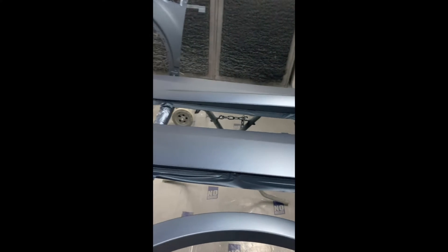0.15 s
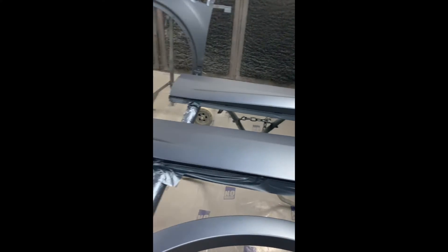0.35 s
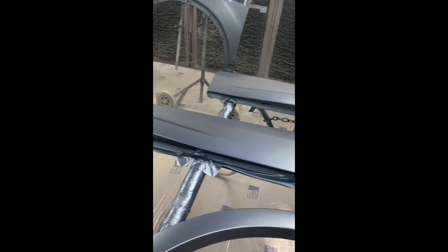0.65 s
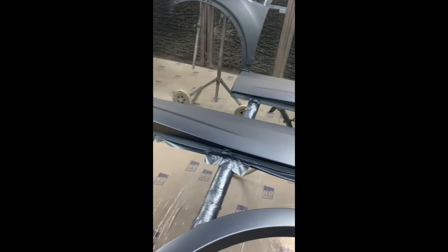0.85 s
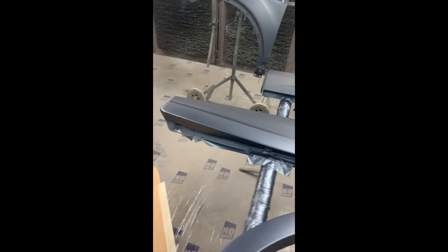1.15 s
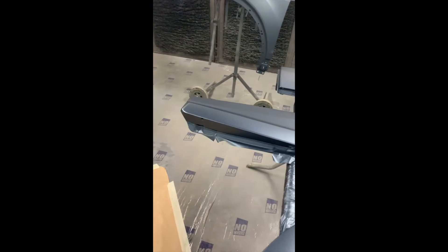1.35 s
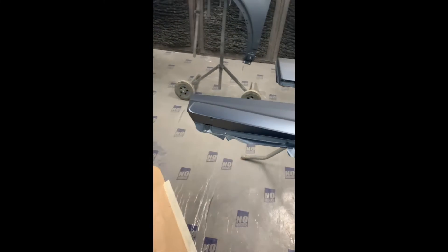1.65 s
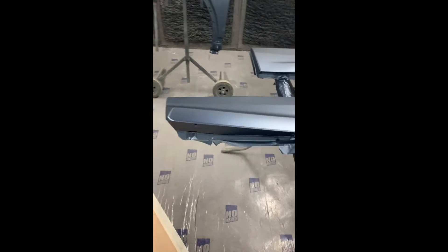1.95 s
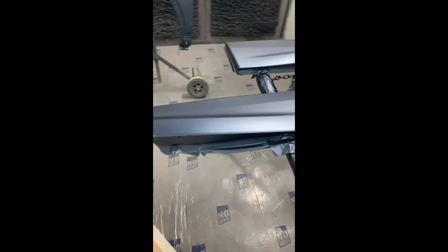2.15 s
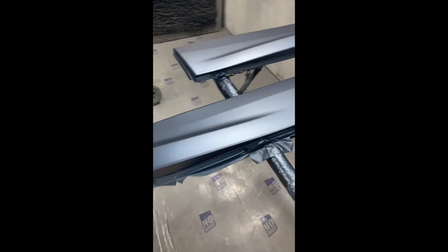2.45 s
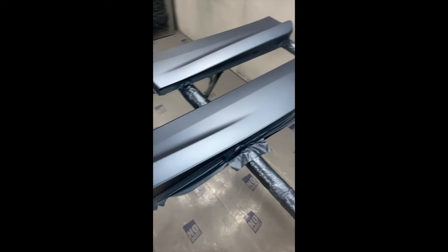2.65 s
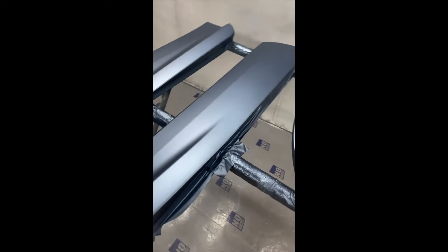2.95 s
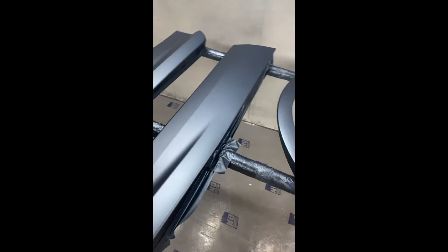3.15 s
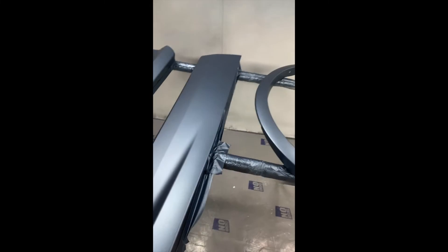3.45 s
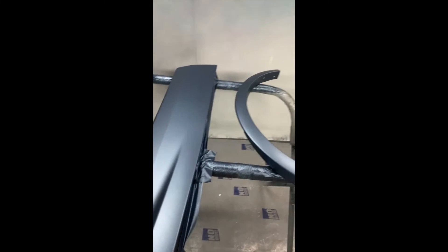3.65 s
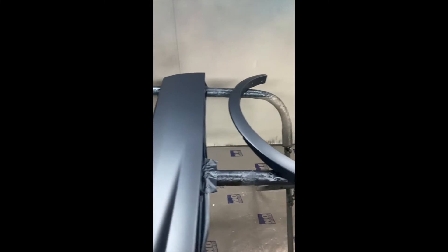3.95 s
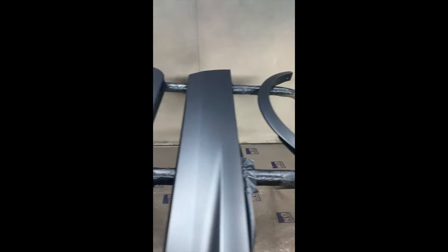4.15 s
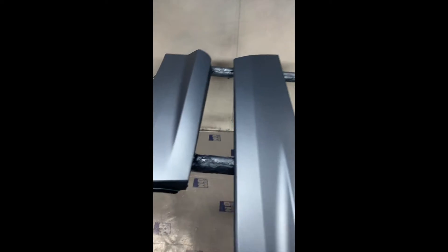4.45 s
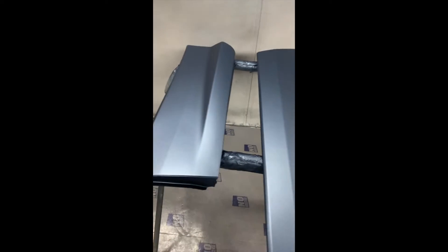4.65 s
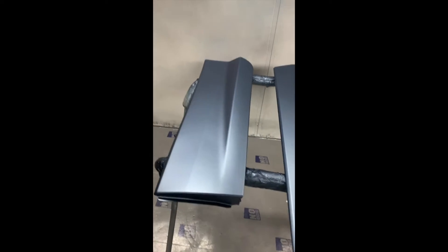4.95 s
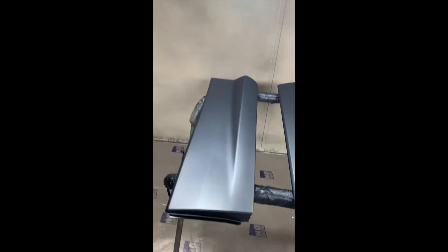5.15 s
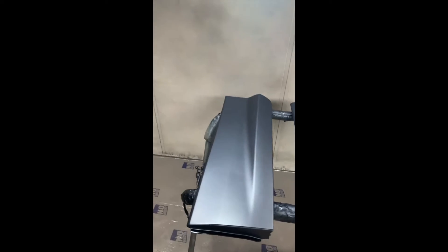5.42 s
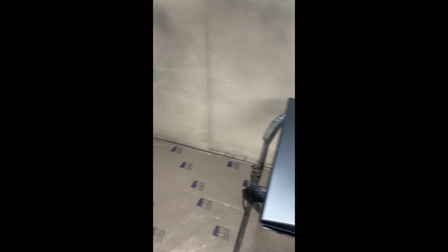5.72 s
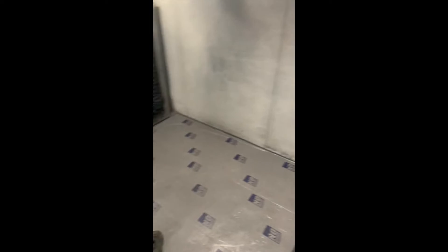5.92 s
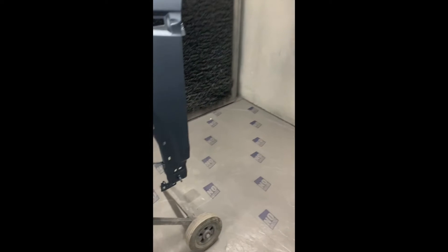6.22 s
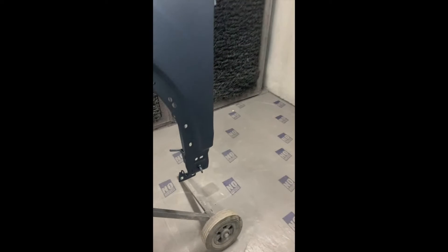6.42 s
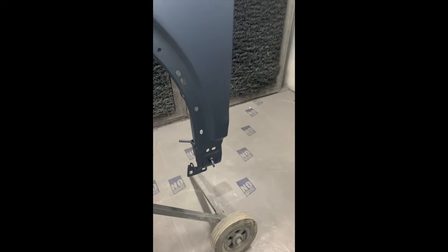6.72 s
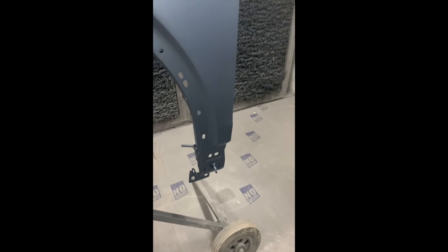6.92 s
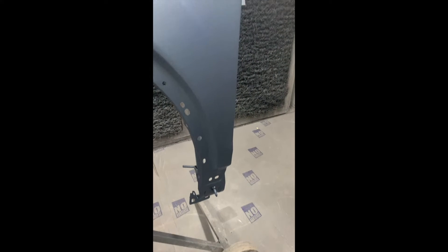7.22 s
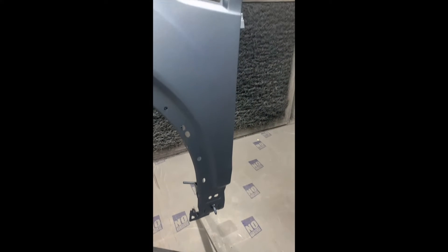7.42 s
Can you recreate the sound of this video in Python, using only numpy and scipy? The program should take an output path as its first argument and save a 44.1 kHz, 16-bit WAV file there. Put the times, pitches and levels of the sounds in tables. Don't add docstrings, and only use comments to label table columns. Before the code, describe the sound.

Inside a hard-walled spray booth, extraction fans roar and hum steadily with soft airy hiss, while shoes lightly scuff paper on the floor.

```python
import sys
import numpy as np
from scipy import signal
from scipy.fft import rfft, irfft, next_fast_len
from scipy.io import wavfile
from scipy.ndimage import uniform_filter1d

SR = 44100
rng = np.random.default_rng(int(sys.argv[2]) if len(sys.argv) > 2 else 0)


def transcribe(u):
    v = np.clip(np.atleast_2d(u).T, -1, 1)
    q = np.round(v * 32767).astype(np.int16)
    wavfile.write(sys.argv[1], SR, q)


def gain_from_decibels(decibels):
    exponent = np.asarray(decibels, float) / 20
    return 10 ** exponent


N = 334278
SLOW = 16

# start in seconds, peak in dB, treble in dB against the peak.
SCUFF_EVENTS = [(0.6739, -41.5, -12), (1.0141, -40, -11), (1.0994, -45, -3.5), (1.3483, -41.5, -10),
                (1.5426, -27.5, -10), (1.5844, -37, -11), (2.0467, -39.5, -14.5), (2.0882, -39, -17),
                (2.3271, -38, -15), (2.5551, -39, -17), (2.8225, -39.5, -9), (2.9894, -46, -10),
                (3.9519, -44, -14.5), (4.049, -38, -12), (6.2894, -41, -10.5)]


def evened(x):
    return x / np.sqrt(np.mean(abs(x) ** 2) + 1e-20)


def read(points, hz):
    f, value = np.transpose(points)
    return np.interp(np.log(hz + 1), np.log(f + 1), value)


def gain_at(rows, t):
    s, gain_db = np.transpose(rows)
    return np.interp(t, s, gain_db)


def above(hz, corner_hz, order):
    return 1 / (1 + (corner_hz / (hz + 1)) ** order)


def below(hz, corner_hz, order):
    return 1 / (1 + (hz / corner_hz) ** order)


def narrow(width_hz, count):
    hz = np.fft.fftfreq(next_fast_len(count), SLOW / SR)
    a, b = rng.standard_normal((2, 2, len(hz)))
    spectrum = (a + 1j * b) / (1 + (2 * hz / width_hz) ** 2)
    return evened(np.fft.ifft(spectrum)[:, :count])


def air(field_db, patchy_db, size):
    hop = size // 4
    frames, hz = N // hop + 5, np.fft.rfftfreq(size, 1 / SR)
    a, b, c, d, patches = rng.standard_normal((frames, len(hz), 5), np.float32).T
    patches = uniform_filter1d(patches, size=2, axis=0)
    patches = evened(uniform_filter1d(patches, size=5000 // hop, axis=1))
    t = np.arange(frames) * hop / SR
    z = np.array([a + 1j * b, c + 1j * d]) * gain_from_decibels(field_db(hz[:, None], t) + patchy_db * patches)
    return signal.istft(z, nperseg=size, noverlap=size - hop)[1][:, :N]


def swells(rows, rest_db, t):
    spread = 0.4
    power = gain_from_decibels(2 * rest_db)
    for s, db, length, *_ in rows:
        power = power + gain_from_decibels(2 * db) * np.exp(-((t - s) / (spread * length)) ** 2 / 2)
    return 10 * np.log10(power)


def throb(t):
    # footfall in seconds, level in dB.
    footfalls = [
        (0.77, -34),
        (1.64, -32),
        (1.92, -33.1),
        (2.96, -32),
        (4.11, -38),
        (4.28, -35),
        (5.13, -40),
        (6.48, -30),
        (7.33, -28),
    ]
    step_s = 0.4
    db = swells([(s, db, step_s) for s, db in footfalls], -40, t)
    return db - db.mean()


def hiss():
    # frequency in Hz, level in dB per Hz.
    colour = [(1500, -28), (3000, -7), (4500, 1.5), (6000, -2.1), (7500, -7), (8100, -3), (10500, -9),
              (14000, -12.5), (15700, -15.5)]
    # time in seconds, gain in dB.
    facing = [
        (0, 0.5),
        (1, 1.5),
        (1.3, -0.5),
        (2.55, 0),
        (3.04, 2.5),
        (3.93, 3),
        (4.6, 2),
        (6.2, 0),
        (6.45, -1),
        (7.58, -2.5),
    ]

    def field_db(hz, t):
        upper, top = above(hz, 7700, 12), above(hz, 13000, 12)
        turn = 0.25 * (1 - upper) + (upper - top) + 1.2 * top
        return read(colour, hz) + gain_at(facing, t) * turn
    return gain_from_decibels(-47) * evened(air(field_db, patchy_db=2.5, size=1024))


def snaps():
    snap_db, snap_t60_s, snap_hz = 9, 0.006, 6000
    echo_s, echo_db = 0.0042, 1
    out, t = np.zeros((2, N)), np.arange(512) / SR
    noises = rng.standard_normal((len(SCUFF_EVENTS), 2, len(t)))
    for (s, db, treble_db), noise in zip(SCUFF_EVENTS, noises):
        at = round((s - .0035) * SR)
        out[:, at:at + len(t)] += gain_from_decibels(db + treble_db + snap_db - 60 * t / snap_t60_s) * noise
    out = out + gain_from_decibels(echo_db) * np.roll(out, round(echo_s * SR), axis=1)
    return signal.sosfilt(signal.butter(2, snap_hz, "high", fs=SR, output="sos"), out)


def scuffs():
    # frequency in Hz, level in dB per Hz.
    colour = [(1500, -22.5), (3000, 2), (5500, 0.5), (9000, 0), (15700, -2.5)]
    rise_s, t60_s, crackle_db = 0.0015, 0.28, 2

    def field_db(hz, t):
        envelope, octaves = 1e-9, np.log2(np.maximum(hz / 6400, 1))
        for s, db, treble_db in SCUFF_EVENTS:
            age = np.maximum(t - s + 0.0033, 0)
            fade_db = 60 * age / t60_s * (hz / 6000 + .1) ** .6
            burst = gain_from_decibels(db + (treble_db + 6.5) * octaves - fade_db)
            envelope = envelope + burst * (1 - np.exp(-age / rise_s))
        return read(colour, hz) + 20 * np.log10(envelope)
    crackle = evened(uniform_filter1d(rng.standard_normal(N), size=40))
    return gain_from_decibels(-17.5 + crackle_db * crackle) * air(field_db, patchy_db=3.0, size=128)


def rush():
    # frequency in Hz, level in dB per Hz.
    roar = [(20, -45), (32, -25.5), (50, -22), (110, -12.5), (170, -11), (235, -9), (310, -11), (410, -15),
            (465, -8.5), (495, -20.5), (600, -18.5), (1350, -25.5), (2600, -42.5), (4000, -50.5),
            (5200, -69)]
    # time in seconds, gain in dB.
    nearness = [
        (0, 0.5),
        (1, 0),
        (1.4, -0.5),
        (2.5, -0.5),
        (4.6, 0.2),
        (5.8, 0.5),
        (6.5, 2.5),
        (7.2, 1.5),
        (7.58, 2),
    ]
    enter_s, leave_s, ease_s, open_db = 0.95, 4.17, 0.11, 2.5

    def field_db(hz, t):
        inside = (np.tanh((t - enter_s) / ease_s) - np.tanh((t - leave_s) / ease_s)) / 2
        open_gain_db = open_db * (inside - inside.mean())
        middle, bass, deep = above(hz, 520, 4), below(hz, 130, 4), below(hz, 60, 6)
        wall_gain_db = gain_at(nearness, t) * (middle + 1.84 * bass)
        return read(roar, hz) + open_gain_db * (1 - middle - bass) + wall_gain_db + throb(t) * deep
    return gain_from_decibels(-17) * evened(air(field_db, patchy_db=2.5, size=2048))


def hum():
    # time in seconds, level in dB, length in seconds, pitch in Hz.
    blade_swells = [(0.115, -17, 0.39, 219.6), (0.356, -17, 0.077, 219), (0.572, -18.5, 0.26, 220.8),
                    (0.84, -15.5, 0.1, 218), (1.019, -18.5, 0.1, 220.3), (1.252, -15.1, 0.09, 219.5),
                    (1.523, -16.1, 0.14, 217), (2.1, -21.5, 0.1, 220.2), (2.467, -20, 0.14, 217.2),
                    (3.202, -22, 0.18, 212.2), (4.466, -23.5, 0.22, 218), (5.13, -19, 0.21, 221.3),
                    (5.45, -18.6, 0.14, 220), (5.823, -21, 0.1, 223.8), (5.919, -22.5, 0.092, 222.3),
                    (6.026, -20, 0.15, 215.4), (6.258, -14, 0.23, 218.7), (6.611, -12.0, 0.13, 215.8),
                    (6.847, -16, 0.07, 216), (7.04, -19.5, 0.085, 216), (7.28, -22.5, 0.18, 213.4),
                    (7.423, -18.5, 0.24, 218.1)]
    # time in seconds, level in dB, length in seconds.
    octave_swells = [(0.24, -23.5, 0.036), (0.7, -25, 0.28), (0.74, -24.5, 0.19), (0.91, -21, 0.1),
                     (1.16, -20.5, 0.18), (1.4, -22, 0.092), (1.64, -21, 0.12), (3.83, -20.5, 0.066),
                     (4.18, -25, 0.52), (4.43, -21, 0.11), (5.08, -25.5, 0.11), (5.96, -20, 0.17),
                     (6.19, -23, 0.46), (7.1, -25, 0.13)]
    # time in seconds, level in dB, length in seconds, pitch in Hz.
    mode_swells = [(0.313, -19.0, 0.13, 292), (0.376, -20.5, 0.15, 255.0), (0.718, -18.5, 0.18, 293.2),
                   (0.96, -25.5, 0.14, 253.3), (1.08, -21.5, 0.13, 291.7), (1.298, -21, 0.2, 289.5),
                   (1.774, -23.5, 0.12, 291.3), (2.516, -25.5, 0.28, 163), (2.695, -21, 0.11, 292.6),
                   (3.528, -18, 0.099, 254.1), (3.916, -22, 0.14, 254.3), (3.965, -25, 0.26, 151.7),
                   (4.202, -23.5, 0.16, 160.1), (4.662, -18, 0.2, 253.3), (4.815, -19.0, 0.16, 292.8),
                   (4.927, -18, 0.09, 254.1), (4.958, -20, 0.1, 153.3), (5.257, -24.5, 0.053, 155.8),
                   (5.352, -17.5, 0.25, 252.8), (5.657, -18, 0.12, 289.1), (5.74, -17, 0.077, 254.4),
                   (6.08, -17.5, 0.078, 287.7), (6.262, -20, 0.18, 290.5), (6.493, -22, 0.18, 155.9),
                   (6.522, -23.1, 0.13, 289.8), (6.582, -21, 0.13, 255.3), (6.83, -23.5, 0.2, 150.7),
                   (6.89, -20, 0.18, 253.8), (7.15, -22.5, 0.29, 251.5), (7.458, -23, 0.13, 152.0)]
    # frequency in Hz, width in Hz, steadiness against the wavering.
    standing_modes = [(156.8, 33, 0.3), (252.6, 16.3, 0.78), (290.9, 17, 0.44)]
    # frequency in Hz, width in Hz, level in dB.
    duct_modes = [(44.7, 8.7, -41.5), (62.36, 10, -34), (346.4, 11, -36), (377.5, 12, -43),
                  (510, 14, -36.5), (519.3, 6.5, -37), (537.3, 9.1, -34.5), (637.6, 3.9, -39),
                  (693, 23, -39), (856, 8.5, -41.5)]
    mode_rest_db = (-27.5, -30.5, -30.5)
    t = np.arange(N // SLOW + 1) * SLOW / SR
    steady = np.array([[1], [1j]])

    def wander(width_hz):
        return narrow(width_hz, count=len(t))

    def fixed_tone(hz):
        return np.exp(2j * np.pi * hz * t)

    def gliding_tone(rows, rest_db):
        turns = np.cumsum(np.interp(t, rows[:, 0], rows[:, -1])) * SLOW / SR
        return gain_from_decibels(swells(rows, rest_db, t)) * np.exp(2j * np.pi * turns)

    out = gliding_tone(np.array(blade_swells), -29) * evened(steady + 0.4 * wander(23))
    octave = gain_from_decibels(swells(octave_swells, -31.5, t)) * fixed_tone(443)
    out += octave * evened(steady + 0.66 * wander(20.0))
    rows = np.array(mode_swells)
    nearest = abs(rows[:, -1:] - np.transpose(standing_modes)[0]).argmin(1)
    for k, (_, width_hz, calm) in enumerate(standing_modes):
        mode = gliding_tone(rows[nearest == k], mode_rest_db[k])
        out += mode * evened(calm * steady + wander(width_hz))
    for mode_hz, width_hz, db in duct_modes:
        db = db + throb(t) * (mode_hz < 55)
        out += gain_from_decibels(db) * fixed_tone(mode_hz) * wander(width_hz)
    return np.sqrt(2) * signal.resample_poly(out.real, SLOW, 1, axis=1, padtype="antireflect")[:, :N]


def ports(pair):
    # frequency in Hz, left-right likeness from 0 to 1.
    likeness = [(40, 1), (90, .9995), (170, .992), (270, .98), (430, .85), (700, .54), (1400, .63),
                (2300, .45), (3500, .74), (4300, .95), (5000, .97), (13000, .94)]
    # frequency in Hz, radians by which left leads.
    left_lead = [(300, 0), (450, .25), (700, .1), (1300, .1), (2400, 1.3), (3400, 1.45), (4690, 3.14)]
    # frequency in Hz, left over right in dB.
    balance = [(200, 0), (430, -1.6), (650, 1.3), (900, 1), (1700, -1), (2600, -.7), (3500, .3), (7000, 0)]
    port_delay_s, margin = .000238, 2048
    size = next_fast_len(N + 2 * margin)
    hz = np.fft.rfftfreq(size, 1 / SR)
    padding = ((0, 0), (margin, size - N - margin))
    a, b = rfft(np.pad(pair, padding, "reflect", reflect_type="odd"))
    same = np.clip(read(likeness, hz), 0, 1)
    lead = read(left_lead, hz) + 2 * np.pi * port_delay_s * np.maximum(hz - left_lead[-1][0], 0)
    right = (same * a + np.sqrt(1 - same ** 2) * b) * np.exp(-1j * lead)
    lean = gain_from_decibels(read(balance, hz) / 2)
    return irfft([a * lean, right / lean], size)[:, margin:margin + N]


def scene():
    return ports(hiss() + snaps() + scuffs() + rush() + hum())


def band_limit(x):
    return signal.sosfilt(signal.butter(12, 15790, fs=SR, output="sos"), x)


def record(dry):
    settled = dry * (1 - .6 * np.exp(-np.arange(N) / SR / .002))
    mix = np.tanh(settled / 1.906) * 1.893
    return band_limit(mix)


dry = scene()
out = record(dry)
transcribe(out)
```